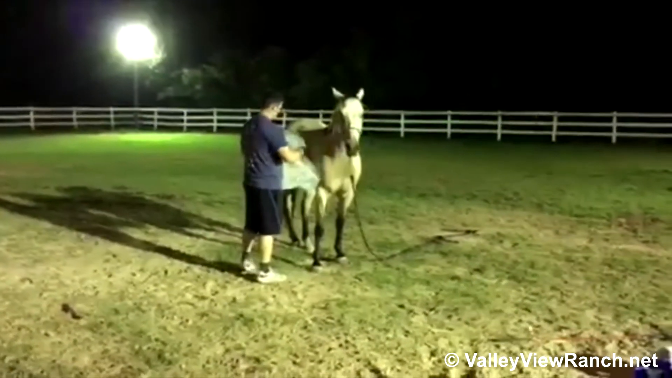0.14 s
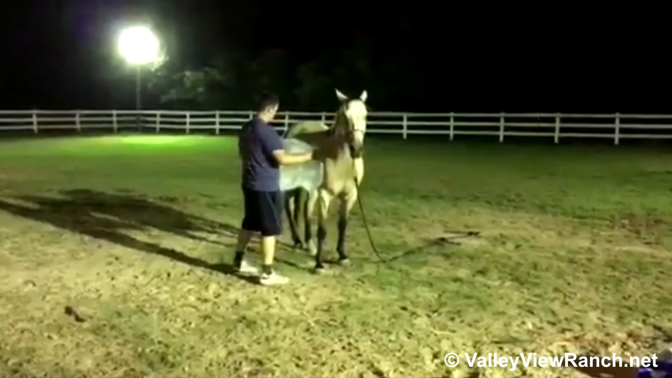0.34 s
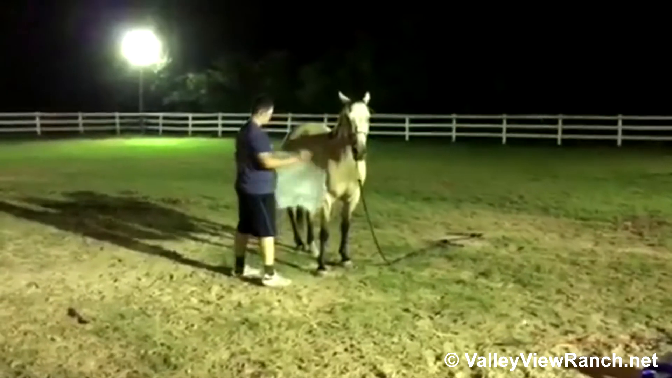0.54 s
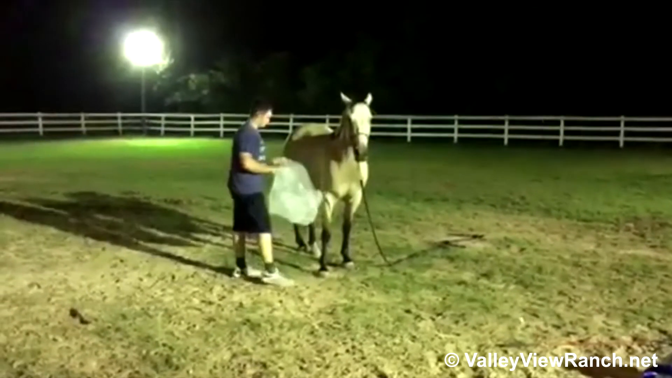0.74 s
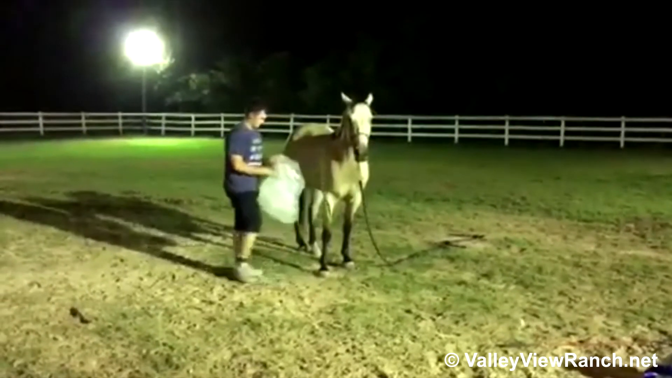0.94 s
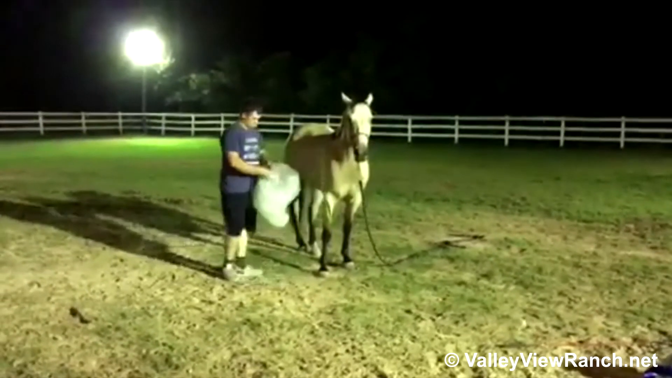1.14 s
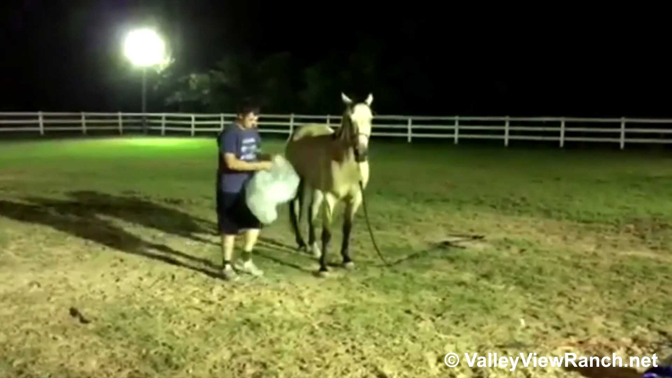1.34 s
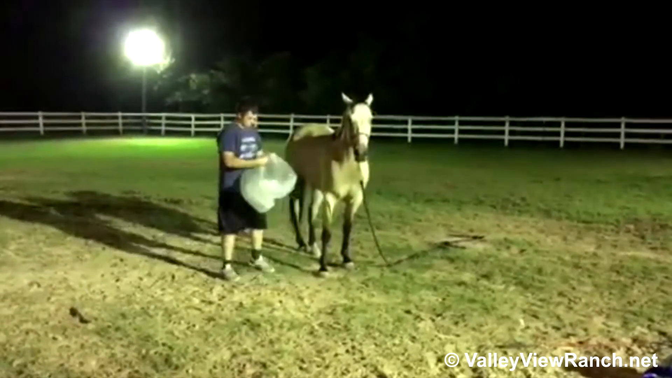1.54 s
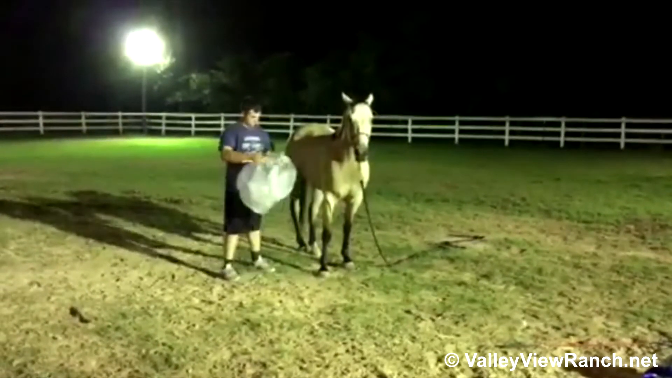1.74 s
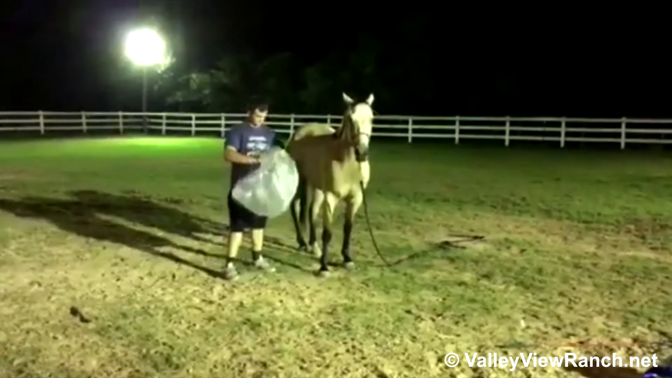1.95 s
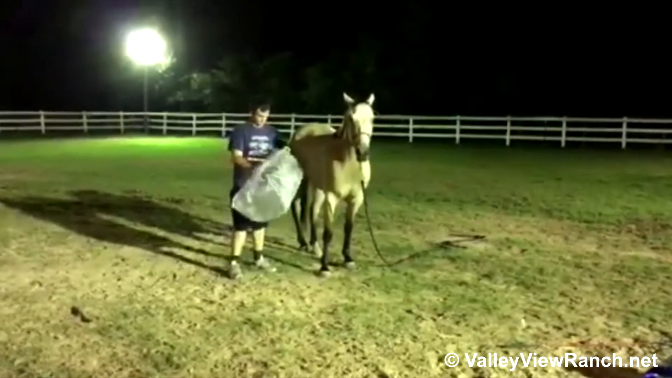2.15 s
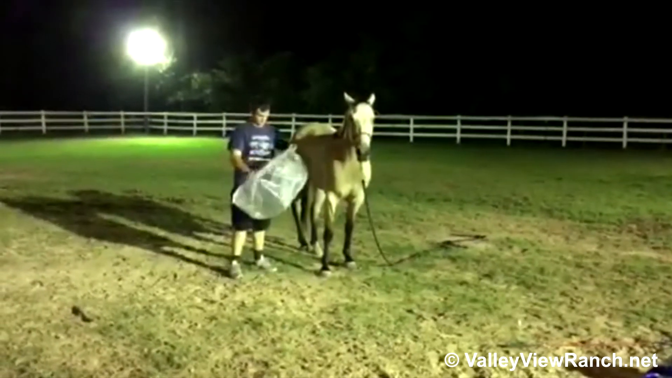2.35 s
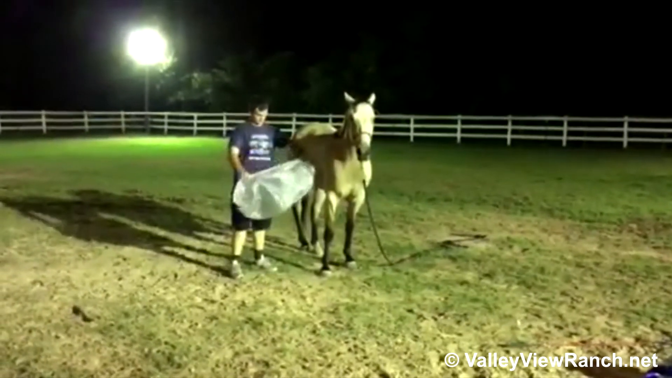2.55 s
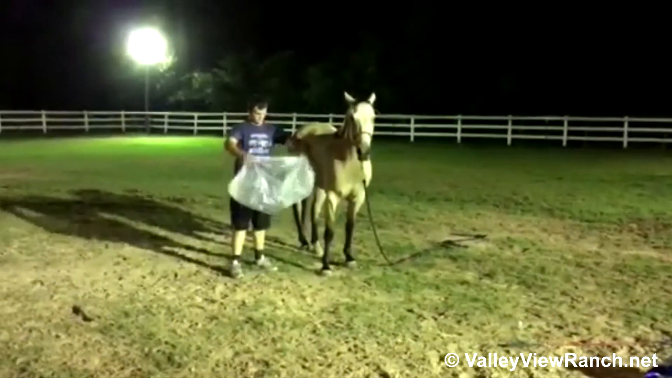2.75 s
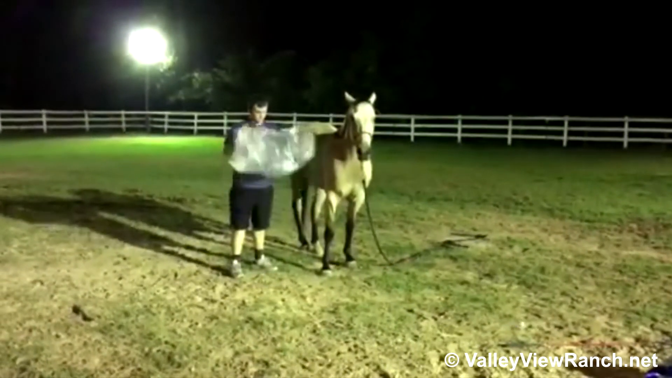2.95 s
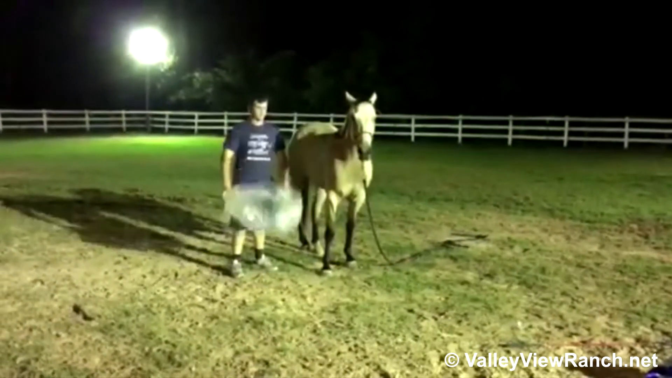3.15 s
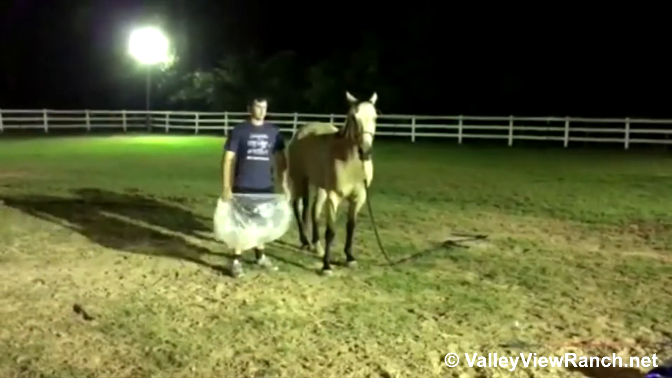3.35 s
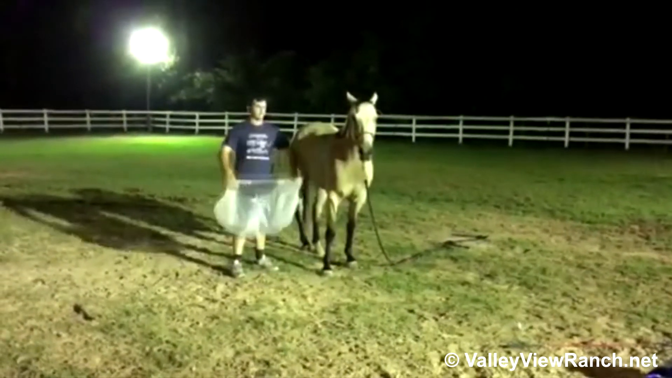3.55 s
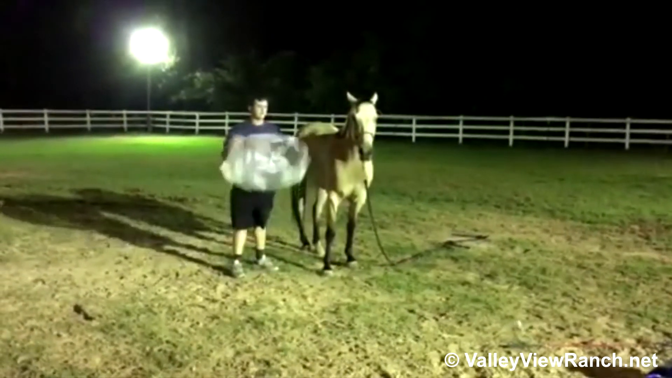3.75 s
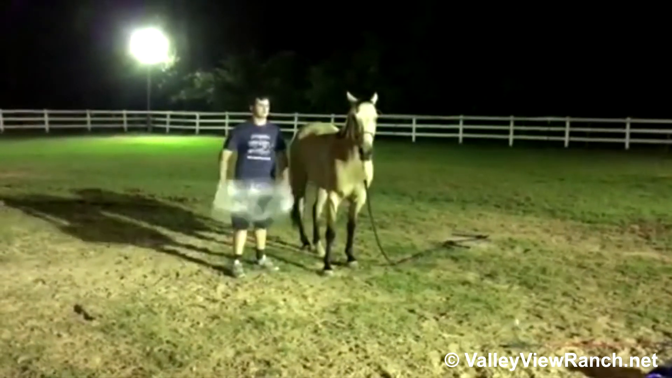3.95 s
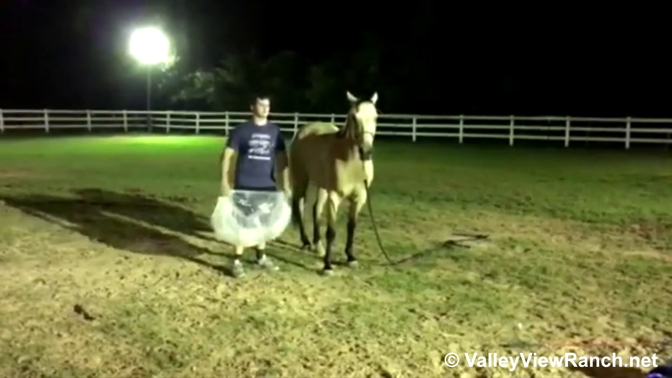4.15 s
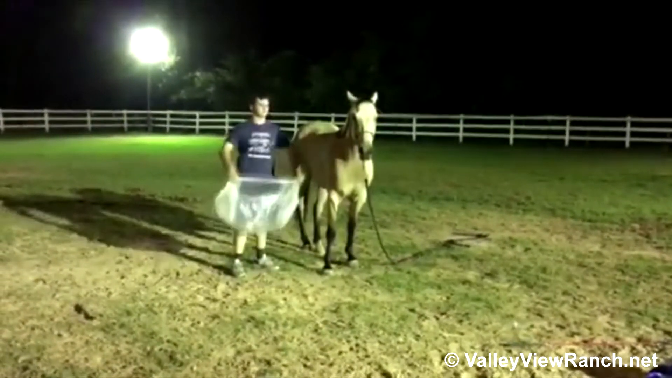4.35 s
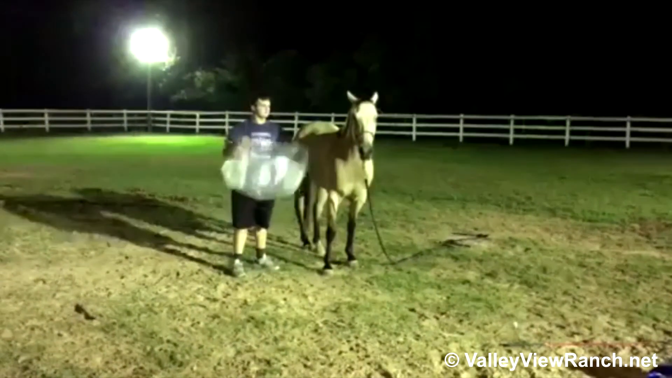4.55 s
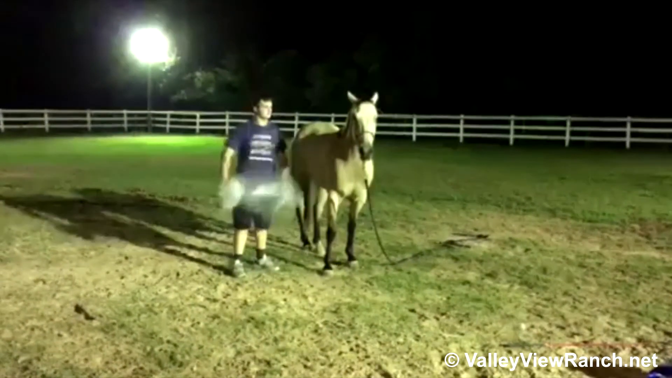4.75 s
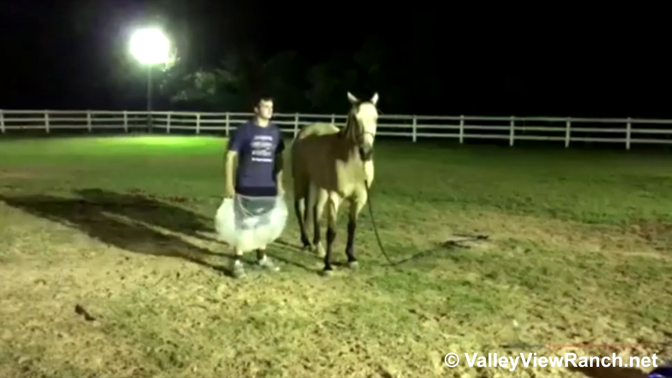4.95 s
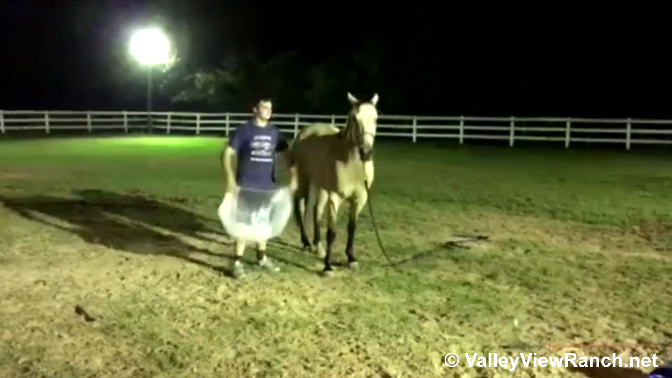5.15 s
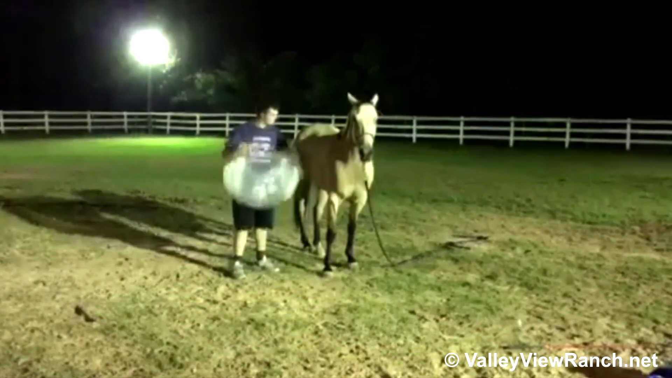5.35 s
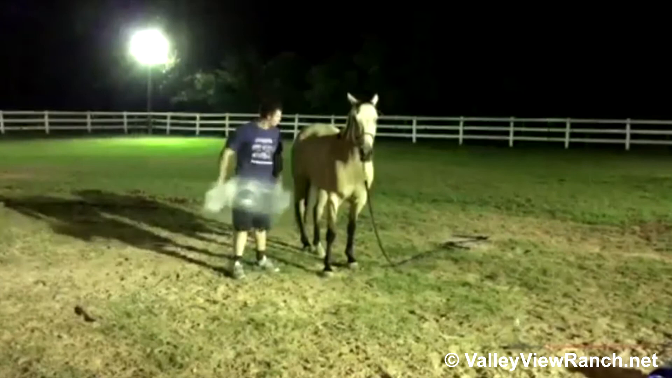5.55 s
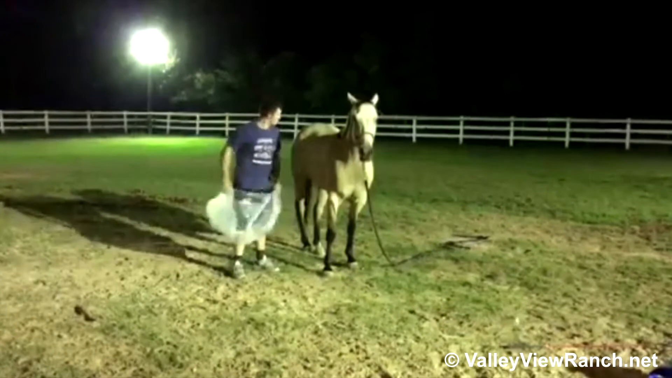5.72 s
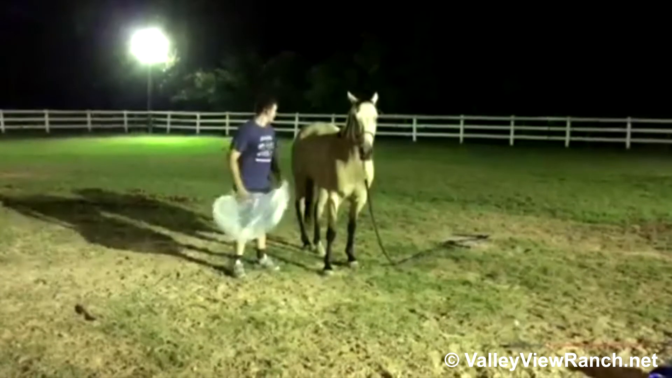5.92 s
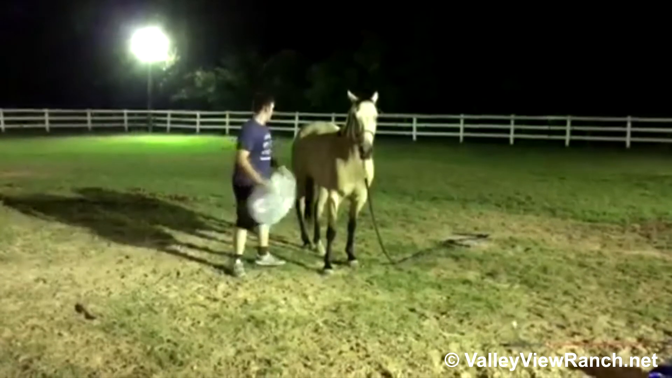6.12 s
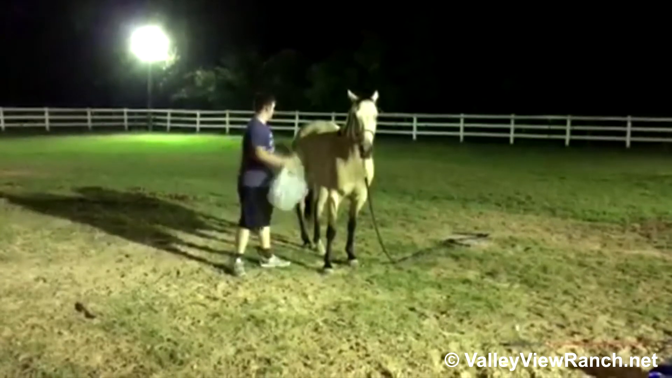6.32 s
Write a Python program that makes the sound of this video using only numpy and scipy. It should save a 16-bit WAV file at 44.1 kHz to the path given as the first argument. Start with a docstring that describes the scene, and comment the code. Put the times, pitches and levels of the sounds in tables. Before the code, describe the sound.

Light plastic rustling, loudest at the very start, with little pops and bright crease clicks, comes from several metres away in a grassy open space. Four sudden loud flaps follow, the third and fourth with the heaviest thumps, each snapping taut with a hollow knock and dense crackle, then flopping slack. Between them only faint crinkling, thin high crickets, a far rumble and slight hiss remain. Small microphone, faint scattered outdoor tail.

```python
"""Plastic bag in a night paddock

A large, thin plastic bag is unfolded and flapped hard four times, several metres from a small microphone.
Buckling facets and ringing pockets crinkle as it is handled; each downstroke roars with dense crackle and air.
Panels snap taut with a thump, a hollow note and a crack; the slack film billows back in low puffs.
Wandering bands of noise make the crickets all around, over a low, distant rumble and a faint hiss."""
import sys
import numpy as np
from scipy import signal
from scipy.fft import rfft, irfft, next_fast_len
from scipy.io import wavfile

SR = 44100
rng = np.random.default_rng(int(sys.argv[2]) if len(sys.argv) > 2 else 0)


def materialize(psi):
    """Save the field psi as 16-bit PCM at rate SR to the path in sys.argv[1].

    A 1-D psi becomes a single channel; in a 2-D psi each row is a channel.
    """
    bounded = np.clip(np.atleast_2d(psi).T, -1, 1)
    quanta = np.round(bounded * 32767).astype(np.int16)
    wavfile.write(sys.argv[1], SR, quanta)


N = 281358
TIME = np.arange(N) / SR  # s


def from_db(db):
    """Decibels to amplitude gain."""
    return 10 ** (np.asarray(db) / 20)


def rms_one(x):
    """Scale to an rms of 1."""
    return x / np.sqrt(np.mean(x ** 2) + 1e-20)


def at_hz(points, hz):
    """Read a spectrum in dB on a log-frequency axis."""
    f, db = np.transpose(points)
    return np.interp(np.log(hz + 1e-9), np.log(f), db)


def noise(gain_at):
    """Noise whose spectrum is the given function of frequency; rms 1."""
    size = next_fast_len(N)
    hz = np.arange(size // 2 + 1) * SR / size
    spectrum = rfft(rng.standard_normal(size)) * gain_at(hz)
    return rms_one(irfft(spectrum, size)[:N])


def drift(per_s):
    """Slow chance with a spread of 1."""
    return noise(lambda f: 1 / (1 + (f / per_s) ** 4))


def swell(start, rise):
    """A quick swell to height 1 that then dies away."""
    age = np.clip((TIME - start) / rise, 0, 50)
    return age * np.exp(1 - age)


def sine_from(start, hz):
    """A sine with zero phase at the start time."""
    return np.sin(2 * np.pi * hz * (TIME - start))


def gesture(start, end, rise_s, fall_s):
    """Swells up to the start, holds until the end, then dies away."""
    before, after = np.maximum(start - TIME, 0), np.maximum(TIME - end, 0)
    return np.exp(-before / rise_s - after / fall_s)


# Far rumble, spectrum shape: f/Hz, relative level/dB
RUMBLE_SPECTRUM = [(15, -10), (35, -21), (55, 3), (75, 3), (115, 0), (160, -11), (230, -18), (420, -22),
                   (1500, -82)]
# Hiss of the night air, spectrum shape: f/Hz, relative level/dB
AIR_SPECTRUM = [(100, 2), (300, 8), (470, -6), (680, 9.5), (950, 2.5), (2200, 2), (4200, -0.5),
                (5500, -11.5), (8000, -16), (11000, -18), (15000, -21)]


def night(air_db=-53.5, rumble_db=-49.0, waver_db=2.5):
    """Distant rumble of wavering level and a faint even hiss, both shaped noise."""
    rumble = noise(lambda f: from_db(at_hz(RUMBLE_SPECTRUM, f)))
    hiss = noise(lambda f: from_db(at_hz(AIR_SPECTRUM, f)))
    return from_db(rumble_db + waver_db * drift(8.6)) * rumble + from_db(air_db) * hiss


# Cricket choruses, their overtones and the narrow line of one nearer cricket: f/Hz, width/Hz, level/dB
CRICKET_BANDS = [(2944, 220, -55), (3227, 320, -58), (3226, 66, -63.5), (6490, 1060, -60), (9390, 1400, -60.5)]


def crickets(throb_db=1.06, throb_hz=14, wander_hz=35):
    """Many far crickets merge into throbbing bands, and one nearer cricket sings a narrow line; their pitch
    wanders as singers join and rest."""
    out = 0
    for hz, width, db in CRICKET_BANDS:
        wander = np.exp(2j * np.pi * np.cumsum(wander_hz * drift(3)) / SR)
        band = noise(lambda f: 1 / (1 + np.abs(2 * (f - hz) / width) ** 3))
        shifted = np.real(signal.hilbert(band, next_fast_len(N))[:N] * wander)
        out = out + from_db(db + throb_db * drift(throb_hz)) * shifted
    return out


def buckles(per_s, spread_db):
    """Random clicks, many small and a few large, of even mean power at any rate."""
    sizes = from_db(spread_db * np.minimum(rng.exponential(1, N), 4))
    return sizes * (rng.random(N) < per_s / SR) / np.sqrt(per_s)


def film(clicks, spectrum, tilt_db=0):
    """Facets of many sizes: each click rings the half-octave bands in its own mix; rms 1 before the tilt."""
    edges = np.geomspace(150, 17000, 15)
    out, power = 0, 0
    for low, high in zip(edges, edges[1:]):
        hz = np.sqrt(low * high)
        bandpass = signal.butter(2, [low, high], "band", fs=SR, output="sos")
        band = signal.sosfilt(bandpass, clicks * rng.standard_normal(N) + 1e-18)
        band = band * from_db(at_hz(spectrum, hz))
        treble_share = 1 / (1 + (3200 / hz) ** 3)
        out = out + band * from_db(tilt_db * treble_share)
        power = power + np.mean(band ** 2)
    return out / np.sqrt(power)


def taut_film(spectrum, tilt_db=0):
    """So many facets buckle at once that they merge into an even crack."""
    return film(buckles(16000, spread_db=2.0), spectrum, tilt_db)


# Handled film, also its pockets and pops: f/Hz, relative level per Hz/dB
RUSTLE_SPECTRUM = [(180, 3), (350, -5), (700, -2.5), (1400, 1), (2200, -2), (3500, -5), (5000, -7.5),
                   (7000, -12.5), (10000, -17.5), (15000, -24)]


def pockets(rate, cycles=26.0):
    """Small pockets of stretched film ring for a few cycles, each at a pitch of its own; rms 1."""
    pitches = np.geomspace(550, 4200, 28)
    clicks = buckles(rate, spread_db=2.0)
    dealt = rng.integers(0, len(pitches), N)  # which pocket a click strikes
    out = 0
    for k, hz in enumerate(pitches):
        w = 2 * np.pi * hz / SR
        r = from_db(-20 * hz / (cycles * SR))  # 20 dB down after that many cycles
        struck = clicks * (dealt == k) + 1e-18
        ringing = signal.lfilter([1 - r, 0, r - 1], [1, -2 * r * np.cos(w), r * r], struck)
        out = out + ringing * from_db(at_hz(RUSTLE_SPECTRUM, hz))
    return rms_one(out)


# The hands pull or fold the film:
# peak t/s, relative level/dB, swelling t/s, dying t/s, treble against middle/dB
FOLDS = [(0.017, -32, 0.02, 0.043, -6.5), (0.171, -44.5, 0.07, 0.066, -2), (0.365, -32, 0.022, .025, -4.5),
         (0.87, -49, 0.03, .08, -0.5), (1.2, -47.5, .09, .08, -2), (1.341, -42.5, 0.047, .03, -2.5),
         (1.464, -47.5, 0.018, 0.023, 0), (1.599, -51.5, 0.019, 0.05, -1), (1.77, -44, 0.066, .06, 0.5),
         (2.156, -36, 0.013, .052, -3.5), (2.55, -54, 0.27, .03, 4), (2.749, -43, 0.11, .055, -0.5),
         (2.92, -53.5, .05, .12, -2), (3.73, -51, .04, .14, -2), (4.33, -52.5, 0.029, 0.056, -3),
         (4.9, -37.5, 0.011, 0.016, -2), (5.175, -48, 0.016, .03, -1), (5.47, -51.5, 0.046, .05, 2),
         (6.09, -41, 0.031, 0.077, -1.5), (6.33, -51.5, .1, 0.17, -5.5)]
IDLE_DB, IDLE_TREBLE_DB = -60, 2  # the held bag never quite stops crinkling
# crinkling as the bag is lifted for a stroke, and settling after it billows
LIFT_S, SETTLE_S, BILLOW_TREBLE_DB = .035, .045, -4


def bending():
    """Level and treble of the crinkle in dB: folds, billowing and idle stirring add up in power."""
    moves = [(from_db(db) * gesture(s, s, rise, fall), treble) for s, db, rise, fall, treble in FOLDS]
    for start, *_, until, db in STROKES:
        moves.append((from_db(db) * gesture(start, until, LIFT_S, SETTLE_S), BILLOW_TREBLE_DB))
    moves.append((from_db(IDLE_DB), IDLE_TREBLE_DB))
    power = sum(gain ** 2 for gain, _ in moves)
    treble_db = sum(gain ** 2 * treble for gain, treble in moves) / power
    return 10 * np.log10(power), treble_db


def rustle(gain_db=-0.92, even_treble_db=-5, per_s=3800, spread_db=2.0,
           pocket_db=-5, pockets_per_s=170, clump_db=1.8, clumps_per_s=35):
    """Handling: faster bending buckles more facets and pockets; the crinkle comes in uneven clumps."""
    level_db, treble_db = bending()
    activity = from_db(0.65 * (level_db - np.mean(level_db)))
    facets = film(buckles(per_s * activity, spread_db), RUSTLE_SPECTRUM, treble_db - even_treble_db)
    crinkle = facets + from_db(pocket_db) * pockets(pockets_per_s * activity)
    return from_db(level_db + gain_db + clump_db * drift(clumps_per_s)) * crinkle


# Single creases flip: t/s, relative level/dB
CREASE_FLIPS = [(0.1346, -26.5), (0.179, -26), (0.2134, -24), (0.837, -31), (0.8609, -27), (1.426, -29),
                (1.91, -31.5), (2.7761, -30), (2.8564, -31), (3.534, -26), (3.781, -29), (4.1657, -23.5),
                (4.694, -28), (6.077, -21), (6.082, -21.5)]
# A flipping crease: f/Hz, relative level per Hz/dB
CREASE_SPECTRUM = [(180, -1), (700, -12), (2000, 10), (5000, 5.5), (9000, 2), (15000, -4)]


def creases(gain_db=-13.0, rise_s=0.0012):
    """A long crease flips over in a short, bright run of clicks."""
    flips = sum(from_db(db + gain_db) * swell(s, rise_s) for s, db in CREASE_FLIPS)
    return flips * taut_film(CREASE_SPECTRUM)


# Slack pockets of film flop over: t/s, note level/dB, f/Hz, crackle level/dB (levels relative)
POPS = [(0.837, -38, 810, -44), (0.947, -48, 820, -45.5), (1.107, -41.5, 640, -47), (1.218, -47, 1510, -48),
        (3.3700, -25, 305, -29.5), (3.462, -38, 1430, -38.5), (3.539, -42, 1080, -41.5),
        (3.65, -63, 1210, -46), (4.212, -33.5, 290, -37), (4.985, -47.5, 1530, -35.5),
        (5.016, -25.5, 280, -36), (5.71, -22.5, 940, -39), (5.726, -25, 286, -35),
        (5.944, -54, 1200, -41.5)]


def pops(ring_s=.0015, crackle_rise_s=0.0035, crackle_tilt_db=-8):
    """A flopping pocket gives a short hollow note and a dull crackle."""
    notes = sum(from_db(db) * swell(s, ring_s) * sine_from(s, hz) for s, db, hz, _ in POPS)
    crumpling = sum(from_db(db) * swell(s, crackle_rise_s) for s, _, _, db in POPS)
    return notes + crumpling * taut_film(RUSTLE_SPECTRUM, crackle_tilt_db)


def billows(air_db=-8, air_hz=270, width=0.34, flutter_db=3, flutter_hz=30):
    """As the bag billows back, its slack skin wobbles and pushes the air in soft, low puffs."""
    motion = sum(from_db(db) * gesture(end, until, LIFT_S, SETTLE_S)
                 for _, end, _, _, _, until, db in STROKES)
    puffs = noise(lambda f: 1 / (1 + (np.log((f + 1) / air_hz) / width) ** 4))
    return motion * from_db(air_db + flutter_db * drift(flutter_hz)) * puffs


# Downstrokes: full speed from t/s, to t/s, relative level/dB, rise/(dB per s), fall/(dB per s),
# billows back until t/s, relative billow level/dB
STROKES = [(3.147, 3.189, -21, 420, 560, 3.39, -40), (3.961, 4.004, -21.5, 372, 431, 4.21, -39.5),
           (4.795, 4.849, -23, 284.5, 460, 5.035, -38.5), (5.596, 5.635, -23.5, 429, 265, 5.745, -33)]
# Film in the rush of air, also the snaps' crack: f/Hz, relative level per Hz/dB
ROAR_SPECTRUM = [(180, 1.5), (350, -1), (700, -2.5), (1400, -1), (2200, -5.5), (3500, -7), (5000, -11),
                 (7000, -14.5), (10000, -20), (15000, -25)]


def strokes(per_s=7000, spread_db=1.0, flutter_db=1.0, flutter_hz=110,
            buffet_db=-7, buffet_hz=165, pocket_db=-7, pockets_per_s=700):
    """Air rushes over the bag: the film flutters, crackles densely and pushes the air in low waves."""
    speed = 0
    for start, end, db, rise, fall, _, _ in STROKES:
        before, after = np.maximum(start - TIME, 0), np.maximum(TIME - end, 0)
        speed = speed + from_db(db - rise * before - fall * after)
    effort = speed / speed.max()
    crackle = film(buckles(per_s * (effort + 0.25), spread_db), ROAR_SPECTRUM)
    crackle = crackle + from_db(pocket_db) * pockets(pockets_per_s)
    fluttering = crackle * from_db(flutter_db * drift(flutter_hz))
    buffet = noise(lambda f: 1 / (1 + (2 * np.log((f + 1) / buffet_hz)) ** 4))
    return speed * (fluttering + from_db(buffet_db) * np.sqrt(effort) * buffet)


def thump(start, hz, cycles):
    """The skin sucks air in, slams it out and settles within a cycle or two."""
    return -swell(start, cycles / hz) ** 3 * sine_from(start, hz)


# The film snaps taut: t/s, air thump level/dB, thump f/Hz, crack level/dB (levels relative)
SNAPS = [(3.1170, -30, 130, -28), (3.1494, -15, 105, -33), (3.1700, -14, 170, -16.5),
         (3.181, -26, 190, -16), (3.9394, -34, 300, -27), (3.9655, -12.5, 360, -36),
         (3.9659, -11, 107, -18.5), (3.982, -24, 85, -24), (3.995, -21, 380, -23), (4.0046, -17, 128, -28),
         (4.8046, -6, 117, -17), (4.8321, -5.5, 150, -16), (4.8570, -11.5, 496, -25.5),
         (5.614, -4, 458, -13), (5.6168, -3.5, 141, -22)]
# the harder the snap, the sooner its crack peaks
CRACK_RISE_S, CRACK_USUAL_DB, CRACK_QUICKENING = 0.0031, -20, 0.48
# the hollow of the filled bag rings after every thump; its level is against the thump
HOLLOW_HZ, HOLLOW_DB, HOLLOW_S = 565, -12.5, 0.002


def snaps():
    """A panel fills with air: a low thump, a hollow note, and a crack as its creases pull straight."""
    thumps, hollow, tension = 0, 0, 0
    for s, thump_db, hz, crack_db in SNAPS:
        thumps = thumps + from_db(thump_db) * thump(s, hz, cycles=0.44)
        ring = swell(s, HOLLOW_S) * sine_from(s, HOLLOW_HZ)
        hollow = hollow + from_db(thump_db + HOLLOW_DB) * ring
        rise_s = CRACK_RISE_S * from_db(CRACK_QUICKENING * (CRACK_USUAL_DB - crack_db))
        tension = tension + from_db(crack_db) * swell(s, rise_s)
    return thumps + hollow + tension * taut_film(ROAR_SPECTRUM)


# each stroke swings the bag down from where it is held; then it is slowly raised again
HELD_M, LOWERED_M, SWING_S, RAISE_S = 1.153, 0.5, 0.12, .65


def bag_height():
    """Metres above the grass."""
    lowered = sum(np.interp(TIME - start, [-SWING_S / 2, SWING_S, RAISE_S], [0, 1, 0])
                  for start, *_ in STROKES)
    return HELD_M + (LOWERED_M - HELD_M) * lowered


GROUND_DELAY_S_PER_M, GRASS_CUT_HZ, GROUND_SHARE = 0.001537, 470, .36


def paddock(x, scatter_db=-21, t60=0.77, scatter_cut_hz=4500):
    """The grass mirrors the bag, later the higher it is held; fence and trees scatter a faint tail."""
    mirrored = np.interp(TIME - GROUND_DELAY_S_PER_M * bag_height(), TIME, x)
    ground = GROUND_SHARE * signal.lfilter(*signal.butter(1, GRASS_CUT_HZ, fs=SR), mirrored)
    age = TIME[:SR]
    echoes = rng.standard_normal(SR) * from_db(-60 * age / t60) * np.clip(age / 0.0062, 0, 1) ** 2
    echoes = signal.lfilter(*signal.butter(1, [300, scatter_cut_hz], "band", fs=SR), echoes)
    tail = signal.fftconvolve(x, echoes / np.linalg.norm(echoes))[:N]
    return (x + ground) / np.hypot(1, GROUND_SHARE) + from_db(scatter_db) * tail


def scene():
    """The bag in the open, with the night around it."""
    bag = rustle() + strokes() + billows() + snaps() + pops() + creases()
    # the slowest air just slips round the bag
    bag = signal.sosfilt(signal.butter(2, 55, "high", fs=SR, output="sos"), bag)
    return (paddock(bag) + crickets() + night())[None]


MIC_DIP_HZ, MIC_DIP_Q, MIC_DIP_DEPTH = 2928, 16, 0.54
CUTOFF_HZ = 15200


def record(dry):
    """The small microphone has a narrow dip; the highest peaks are rounded and the top is cut."""
    dip = signal.lfilter(*signal.iirpeak(MIC_DIP_HZ, MIC_DIP_Q, fs=SR), dry)
    coloured = dry - MIC_DIP_DEPTH * dip
    rounded = coloured / (1 + coloured ** 4) ** .25
    return signal.sosfilt(signal.ellip(10, .1, 80, CUTOFF_HZ, fs=SR, output="sos"), rounded)


dry = scene()
out = record(dry)
materialize(out)
```